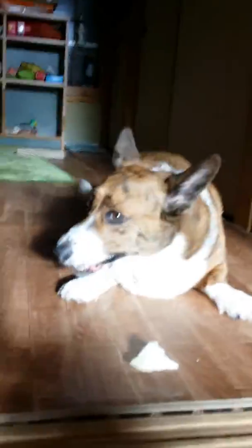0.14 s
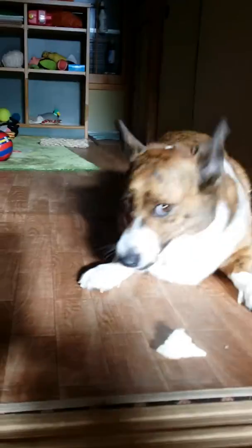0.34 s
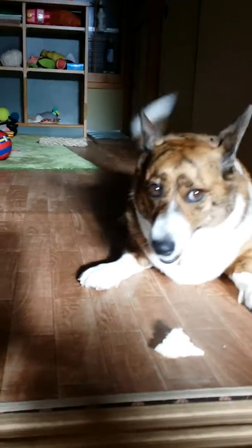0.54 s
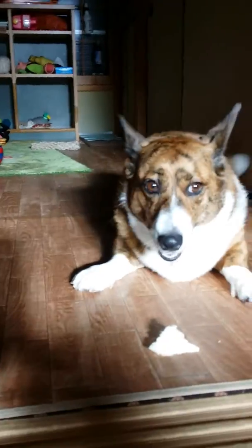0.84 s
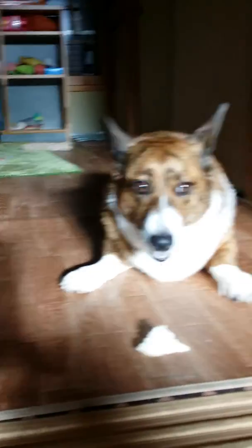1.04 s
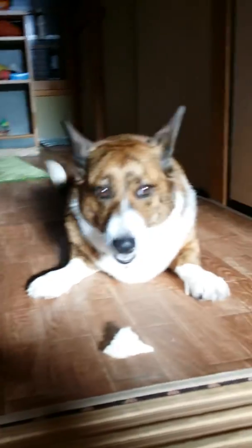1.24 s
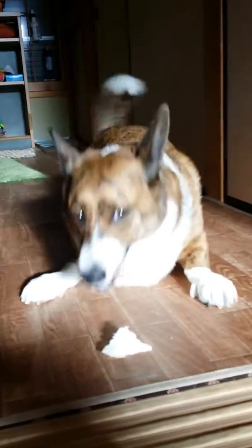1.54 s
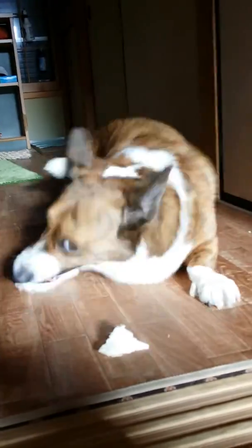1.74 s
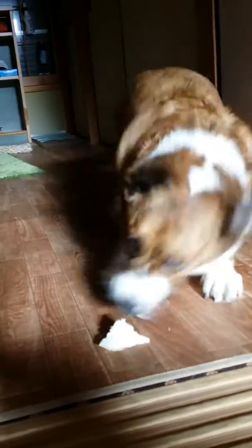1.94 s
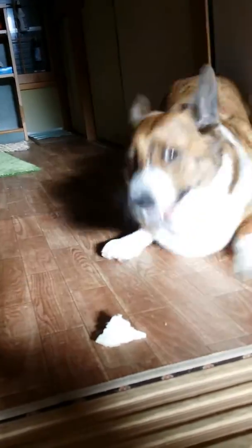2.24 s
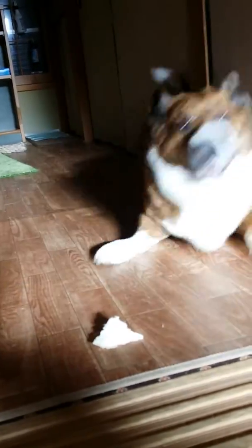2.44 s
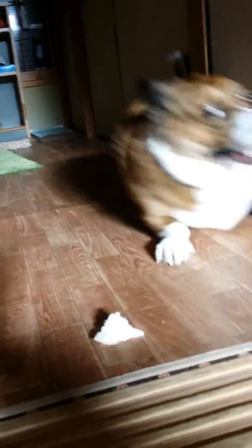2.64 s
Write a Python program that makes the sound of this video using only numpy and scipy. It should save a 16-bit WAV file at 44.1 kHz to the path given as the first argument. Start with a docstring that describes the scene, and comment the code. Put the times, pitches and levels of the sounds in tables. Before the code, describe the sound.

An excited dog gives two short, hoarse growls in a small room. The microphone pops on the left, then more growls come close together as claws click and paws thud and slide on the wooden floor.

```python
"""An excited dog growls in a small room: uneven vocal pulses ring its chest and throat, and air rasps
past its teeth. A faint scuff and soft steps on the wooden floor lead to a second hoarse growl, and
at 1.5 s the left microphone pops. Then the growls come close together as the dog lunges and jumps:
claws click, paws thud and slide on the boards. The right microphone is muffled throughout."""
import sys
import numpy as np
from scipy import signal
from scipy.fft import rfft, irfft, next_fast_len
from scipy.io import wavfile
from scipy.ndimage import uniform_filter1d

SR = 44100
rng = np.random.default_rng(int(sys.argv[2]) if len(sys.argv) > 2 else 0)


def master_out(mix):
    """Clip the mix to full scale and print it as 16-bit PCM to the path in sys.argv[1]."""
    frames = np.transpose(np.atleast_2d(mix))
    ceiling = np.clip(frames, -1, 1)
    pcm = np.round(ceiling * 32767).astype(np.int16)
    wavfile.write(sys.argv[1], SR, pcm)


N = 123479
TIME = np.arange(N) / SR

# Growl envelopes, one list per growl. Each row: time in seconds, then chest, throat, rasp, hiss in dB.
GROWLS = [
    [(0.175, -72, -61, -62, -63), (0.185, -38, -50, -56, -54), (0.201, -23.5, -25.5, -44.5, -51.5),
     (0.215, -20.5, -22.5, -38.5, -44.5), (0.247, -17.5, -15.5, -31.5, -38),
     (0.291, -20.5, -18.5, -36, -41), (0.343, -22, -26, -33, -42), (0.367, -27.5, -66, -29.5, -40.5),
     (0.391, -32.5, -52, -40, -58), (0.42, -42, -62, -62, -55)],
    [(1.195, -52, -52, -59, -65), (1.209, -39, -49, -49, -52), (1.239, -18, -26, -41, -43),
     (1.263, -27, -30.5, -39, -38), (1.285, -27, -29, -35.5, -39), (1.347, -22.5, -35, -35.5, -34),
     (1.359, -37, -34, -27, -50), (1.41, -51, -76, -66, -58)],
    [(1.602, -25, -23.5, -37, -50.5), (1.646, -18, -23.5, -34, -45), (1.712, -18, -16.5, -29, -37.5),
     (1.732, -19, -26, -36, -53), (1.748, -20.5, -19.5, -30.5, -42.5), (1.85, -22.5, -27.5, -27.5, -46.5),
     (1.882, -20, -36, -25, -50.5), (1.904, -39, -53, -46, -56), (1.932, -31.5, -34, -35, -50),
     (1.95, -36, -43, -41, -54)],
    [(2.05, -53, -68, -49, -62), (2.064, -33, -34.5, -36, -48), (2.082, -22, -31, -32.5, -36.5),
     (2.094, -27.5, -40, -35.5, -50), (2.122, -54, -46, -39.5, -51), (2.13, -46, -32, -54, -44)],
    [(2.355, -53, -45, -44, -43), (2.365, -36, -36, -37.5, -43), (2.381, -22, -34, -32, -38),
     (2.399, -19, -20.5, -36, -38.5), (2.429, -17.5, -38.5, -27, -28.5), (2.469, -25, -38, -35.5, -31.5),
     (2.481, -27, -34, -21.5, -29.5), (2.507, -28.5, -36, -55, -49), (2.517, -29, -48, -56, -51),
     (2.55, -34.5, -55, -66, -70)],
]
LAST_GROWL = [(2.78,-47,-53,-56,-66),(2.792,-24.5,-35,-44.5,-43.5),(2.8,-31,-38,-32,-33.5)]
# Resonances of the chest, then of throat and mouth in each call. Each row: frequency in Hz, gain in dB.
CHEST = [(25,-55),(45,-26),(70,-10),(105,-2),(150,2),(200,-2),(290,-4),(380,-17),(520,-34),(1000,-70)]
WOOF = [(400,-10.5),(640,-2),(800,-7.5),(1000,-11),(1280,-18.5),(1480,-26.5),(1950,-21),(2290,-18),(2600,-31.5),(3000,-23.5),(3450,-37.5),(4150,-29.5),(4650,-35.5),(5600,-29),(6900,-26.5),(8000,-37),(9300,-44.5),(11500,-35.5),(15000,-56.5)]
SNARL = [(400,-10),(630,3),(790,-6),(1000,-1.5),(1100,-16),(1230,-4.5),(1550,-14.5),(2100,-11),(2450,-5),(2850,-11.5),(3400,-1),(3850,-13),(4380,-11),(5100,-13),(6000,-8),(6750,-4.5),(8000,-19),(9500,-30.5),(12500,-21),(15000,-38.5)]
RUMBLE = [(430,-8),(600,3.5),(780,3),(920,-5.5),(1100,-13),(1270,-9.5),(1480,-25),(1950,-18.5),(2290,-17.5),(2600,-20),(2880,-20),(3200,-33),(4700,-34),(6200,-30),(7200,-22),(7900,-29.5),(9000,-39.5),(12500,-37),(15000,-50.5)]
RASPING = [(400,-5),(560,5.5),(750,1.5),(950,2.5),(1250,-1),(1520,1),(1750,4),(2100,3.5),(2430,2.5),(3100,-3),(3500,-3.5),(3850,-5),(4480,-1.5),(4950,-7.5),(6000,-3.5),(7000,-2.5),(8500,-12),(9500,-23),(12000,-19),(15000,-29)]
# Bands that swell and fade separately. Each row: frequency in Hz, gain in dB.
THROAT_BAND = [(200,-43),(430,-2.5),(1300,-6),(1900,-15.5),(4000,-57)]
RASP_BAND = [(600,-31.5),(1400,-4),(3000,-2.5),(4500,-18)]
HISS_BAND = [(2000,-26),(3400,3),(15000,-2.5)]
CHEST_DB, THROAT_DB, RASP_DB, HISS_DB = -2, -1.5, 2, 5

def growls():
    """Source and filter: one pulse train rings chest and throat and chops the air at the teeth."""
    pulses, puffs, fundamental = vocal_folds()
    def voice(*shapes, air_share):
        turbulence = unit(puffs * rng.standard_normal(N))
        source = np.sqrt(1 - air_share) * unit(pulses) + np.sqrt(air_share) * turbulence
        return unit(coloured(source, *shapes))
    body = voice(CHEST, air_share=0.092) + amp(-1) * fundamental
    out = np.zeros(N)
    for rows, tract in zip(GROWLS + [LAST_GROWL], [WOOF, SNARL, RUMBLE] + 3 * [RASPING]):
        chest, throat, rasp, hiss = envelopes(rows)
        out += amp(CHEST_DB) * chest * body
        out += amp(THROAT_DB) * throat * voice(tract, THROAT_BAND, air_share=0.56)
        out += amp(RASP_DB) * rasp * voice(tract, RASP_BAND, air_share=1)
        out += amp(HISS_DB) * hiss * voice(tract, HISS_BAND, air_share=1)
    return out


# Vibration of the vocal folds. Each row: time in seconds, pulse rate in Hz, timing scatter in cycles.
PITCH = [(.18,124.8,.18),(0.249,152.1,0.164),(0.329,145.8,.14),(0.369,122.1,.16),(.42,121.7,0.15),(1.21,111.3,0.1565),(1.291,124.3,0.17),(1.349,146.3,.1),(1.599,122.3,0.083),(1.64,129.6,0.177),(1.68,147.3,.13),(1.769,146.9,.14),(1.82,111.5,.1),(1.88,92.1,.08),(1.95,95.78,0.12),(2.059,120,.04),(2.096,152,0.065),(2.38,120.6,.2),(2.431,145,.2),(2.481,104.6,.18),(2.8,150.3,0.11)]
SHIMMER_DB, HOARSE_SCATTER_CYCLES, PUFF_S = 4.5, 0.073, 0.003

def vocal_folds():
    """Jitter and shimmer make a voice hoarse; regular pulses leak less air and hum more."""
    times, hz, scatter = np.transpose(PITCH)
    cycles = np.cumsum(np.interp(TIME, times, hz)) / SR
    beats = np.arange(600)
    timing_draw, size_draw = rng.standard_normal((len(beats), 2)).T
    jitter = np.interp(np.interp(beats, cycles, TIME), times, scatter) * timing_draw
    onsets = np.interp(beats + jitter, cycles, np.arange(N), right=N).astype(int)
    pulses = np.bincount(onsets, amp(SHIMMER_DB * np.tanh(size_draw)), N + 1)[:N]
    puffs = unit(signal.lfilter([1], [1, -np.exp(-1 / (PUFF_S * SR))], pulses))
    regularity = 1 / (1 + (np.interp(TIME, times, scatter) / HOARSE_SCATTER_CYCLES) ** 4)
    leak = 0.6 * (1 - regularity)
    return pulses, puffs + leak, regularity * np.cos(2 * np.pi * cycles)


# Resonances of lips and nose. Each row: peak time and length in seconds, frequency in Hz,
# glide in Hz per second, half-bandwidth in Hz, level in dB.
WHEEZES = [(0.293,0.029,633,0,44.6,-21),(0.387,0.015,618,10,36.4,-36.5),(1.30,0.082,1217,600,43.4,-36),(1.305,0.062,4423,0,121.9,-35),(1.365,0.033,2433,0,80,-34),(1.378,0.027,1423,0,60,-41.5),(1.69,0.058,2286,0,50.3,-25),(1.755,0.031,649.7,0,30,-33),(1.853,0.057,3463,8998,332.4,-35),(2.40,0.019,942,0,79.6,-34),(2.43,0.034,2408,14,80.9,-22.5),(2.446,0.057,4514,0,130,-29),(2.48,0.041,1768,2000,59,-31),(2.55,.04,1795,0,25,-51)]

def wheezes():
    """Narrow-band resonance: air briefly excites a fluttering tone, steady in pitch or gliding."""
    out = np.zeros(N)
    for peak, length, hz, glide, width_hz, db in WHEEZES:
        t = TIME - peak
        lowpass = signal.butter(2, width_hz, fs=SR, output='sos')
        flutter = unit(signal.sosfilt(lowpass, rng.standard_normal((2, N))))
        phase = 2 * np.pi * (hz * t + glide * t * t / 2)
        swell = amp(db) * np.exp(-2 * (t / length) ** 2)
        out += swell * (flutter[0] * np.cos(phase) + flutter[1] * np.sin(phase))
    return out


# Contacts of claws and teeth. Each row: start in seconds, level in dB, 60 dB decay time in seconds.
CLICKS = [(1.928,-31,0.038),(1.9674,-25,0.024),(1.972,-24.5,.035),(2.2,-38,.05),(2.29,-36,0.019),(2.603,-21.5,0.057),(2.633,-29.5,0.045),(2.715,-35,0.029)]
# Their spectrum. Each row: frequency in Hz, gain in dB.
CLICK_COLOUR = [(100,2.5),(300,5),(750,-1.5),(950,3),(1300,-5.5),(2100,1),(2800,0),(3800,-2.5),(7000,-3.5),(10000,-21),(15000,-30)]

def clicks():
    """Hard impact: a short contact excites a broad spectrum that decays exponentially."""
    decays = sum((TIME > start) * amp(db - 60 * since(start) / t60) for start, db, t60 in CLICKS)
    return noise(CLICK_COLOUR) * decays


# Footfalls. Each row: start in seconds, level in dB, frequency in Hz, 60 dB decay time in seconds.
THUDS = [(0.858,-48.5,125,.12),(1.0,-39,141,0.097),(1.069,-41.5,95,0.23),(1.983,-17,80,0.12),(2.487,-28,86.7,0.69),(2.526,-19.5,48.5,0.21),(2.6,-34,152,0.18),(2.67,-38.5,164.3,0.49)]
THUD_ATTACK_S = 0.0048

def paw_thuds():
    """Damped vibration: each soft footfall rings one low mode of the boards."""
    out = np.zeros(N)
    for start, db, hz, t60 in THUDS:
        t = since(start)
        attack = 1 - np.exp(-t / THUD_ATTACK_S)
        out -= amp(db - 60 * t / t60) * attack * np.sin(2 * np.pi * hz * t)
    return out


# Sliding of fur and pads. Each row: time in seconds, level in dB.
SLIDING = [(0,-79),(.85,-78),(1.0,-67),(1.15,-58.5),(1.45,-45.5),(1.58,-48.5),(1.95,-42.5),(2.03,-47),(2.15,-39.5),(2.21,-42.5),(2.26,-46.5),(2.55,-40.5),(2.65,-39),(2.8,-45.5)]
# Spectra of the sliding and of a single scuff. Each row: frequency in Hz, gain in dB.
SLIDING_COLOUR = [(30,-16),(70,3),(200,5),(400,-9),(1200,-11),(2500,-16),(6000,-17.5),(10000,-20),(15000,-31)]
SCUFF_COLOUR = [(200,-19.5),(600,6),(1000,0.5),(1400,4),(2200,-10),(3300,1),(4500,-21),(9000,-24),(15000,-36.5)]
GRAIN_DB, SCUFF_DB = 2.5, -59.5

def scuffle():
    """Sliding friction: one brief scuff, then a growing, grainy rub of fur and pads on the boards."""
    grain = amp(GRAIN_DB * unit(uniform_filter1d(rng.standard_normal(N), size=300)))
    scuff = envelopes([(0.778, SCUFF_DB), (0.828, SCUFF_DB)])[0] * noise(SCUFF_COLOUR)
    return scuff + envelopes(SLIDING)[0] * unit(grain * noise(SLIDING_COLOUR))


# Bass-cut filters of the left microphone. Each row: corner frequency in Hz, damping ratio.
POP_FILTERS = [(58,0.3),(105,0.45)]
POP_S, POP_DB, POP_DECAY_S, POP_SOFTEN_HZ = 1.5397, -0.9, 0.02, 8840

def mic_pop():
    """Transient response: a sudden, decaying step rings out through the bass-cut filters."""
    def channel(hz):
        s = 1j * hz
        stages = [s * s / (s * s + 2 * damping * f * s + f * f) for f, damping in POP_FILTERS]
        return np.prod(stages, axis=0) / (1 + s / POP_SOFTEN_HZ)
    step = (TIME > POP_S) * np.exp(-since(POP_S) / POP_DECAY_S)
    return amp(POP_DB) * filtered(step, channel)


# Decay of the room. Each row: frequency in Hz, reverberation time in seconds.
ROOM_T60 = [(100,.38),(600,0.27),(2500,0.24),(7000,0.3),(14000,0.38)]
# Strength of the reflections. Each row: frequency in Hz, gain in dB.
REFLECTIONS = [(80,-15.5),(170,-12),(330,-10.5),(600,-5),(1200,2),(2500,-4),(6000,-3.5),(14000,-3)]

def room(direct):
    """Reverberation: a short diffuse tail, different at each microphone, follows the direct sound."""
    hz, t, spectra = signal.stft(rng.standard_normal((2, SR // 2)), SR, nperseg=256)
    decay = amp(-60 * t / along(ROOM_T60, hz)[:, None])
    tail = signal.istft(spectra * decay, SR, nperseg=256)[1]
    tail = np.pad(tail / np.linalg.norm(tail[0]), ((0, 0), (150, 0)))  # arrives 3.4 ms later
    reflected = signal.fftconvolve(direct[None], tail, axes=1)[:, :N]
    return direct + coloured(reflected, REFLECTIONS)


# Self-noise, then the right microphone's response against the left. Each row: frequency in Hz, gain in dB.
MIC_HISS = [(100,5.5),(5500,-17),(6500,-4.5),(7300,4.5),(8500,-6),(10000,-4.5),(12000,-17.5),(15000,-15.5)]
RIGHT_MIC = [(60,1.1),(300,2),(700,1),(1300,-1),(2300,-8),(4400,-18),(8000,-31.5),(10500,-14),(15000,-2)]
LOW_CUT_HZ, MIC_HISS_DB, RIGHT_LAG_S = 54, -56.5, 0.00012

def microphones(pressure):
    """Frequency response and self-noise: both cut deep bass and hiss; the right is muffled and lags."""
    def muffle_and_delay(hz):
        return amp(along(RIGHT_MIC, hz)) * np.exp(-2j * np.pi * hz * RIGHT_LAG_S)
    left, right = signal.sosfilt(signal.butter(4, LOW_CUT_HZ, 'high', fs=SR, output='sos'), pressure)
    left += amp(MIC_HISS_DB) * noise(MIC_HISS)
    right += amp(MIC_HISS_DB) * noise(MIC_HISS)
    return left, filtered(right, muffle_and_delay)


def amp(db):
    """Decibels to gain."""
    return 10 ** (np.asarray(db) / 20)


def unit(x):
    """Scale to rms 1."""
    return x / np.sqrt(np.mean(x ** 2) + 1e-20)


def since(start):
    """Seconds since a moment, zero before it."""
    return np.maximum(TIME - start, 0)


def along(points, hz):
    """Interpolation on a logarithmic frequency axis."""
    frequencies, values = np.transpose(points)
    return np.interp(np.log(hz + 1), np.log(frequencies + 1), values)


def envelopes(rows, edge_s=0.0021):
    """One amplitude envelope for each dB column, fading in and out at the ends."""
    times, *levels = np.transpose(rows)
    gate = np.clip(np.minimum(TIME - times[0], times[-1] + edge_s - TIME) / edge_s, 0, 1)
    return gate * np.array([amp(np.interp(TIME, times, db)) for db in levels])


def filtered(x, response):
    """Linear filtering: the spectrum is multiplied by a frequency response."""
    size = 2 * next_fast_len(N // 2 + 4096)
    return irfft(rfft(x, size) * response(np.fft.rfftfreq(size, 1 / SR)), size)[..., :N]


def coloured(x, *shapes):
    """Minimum-phase filtering through the given spectral shapes in series."""
    def response(hz):
        cepstrum = irfft(np.log(amp(sum(along(points, hz) for points in shapes))))
        cepstrum[1:len(cepstrum) // 2] *= 2
        cepstrum[len(cepstrum) // 2 + 1:] = 0
        return np.exp(rfft(cepstrum))
    return filtered(x, response)


def noise(points):
    """Coloured noise of rms 1."""
    return unit(coloured(rng.standard_normal(N), points))


# Steady background of the room. Each row: frequency in Hz, gain in dB.
ROOM_TONE = [(20,-58.5),(60,-1),(150,5.5),(260,-4.5),(600,-1),(1200,-26),(3000,-36),(15000,-59)]
ROOM_TONE_DB = -62

def scene():
    """Superposition: dog, reflections and room tone add at two microphones; the left one pops."""
    dog = growls() + wheezes() + clicks() + paw_thuds() + scuffle()
    left, right = microphones(room(dog) + amp(ROOM_TONE_DB) * noise(ROOM_TONE))
    return np.array([left + mic_pop(), right])


TOP_HZ = 15100

def record(dry):
    """Band limiting: the response falls to zero over the top 400 Hz."""
    return filtered(dry, lambda hz: np.clip((TOP_HZ - hz) / 400, 0, 1))


dry = scene()
out = record(dry)
master_out(out)
```